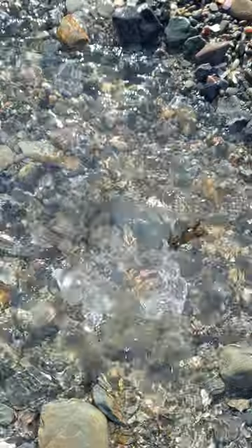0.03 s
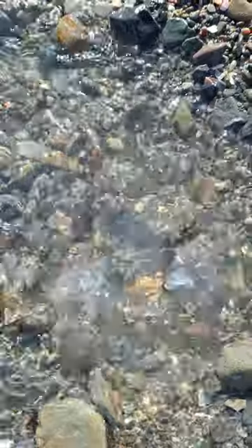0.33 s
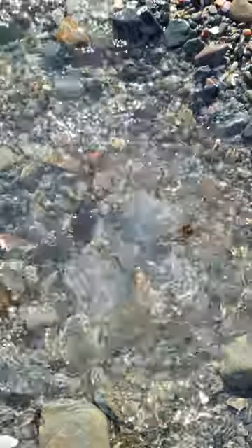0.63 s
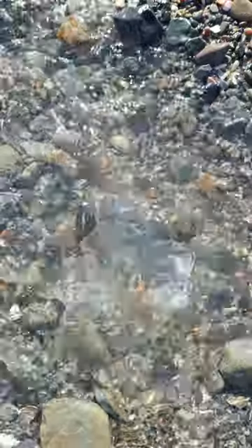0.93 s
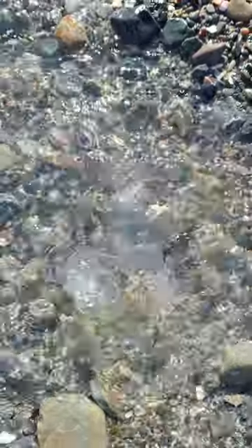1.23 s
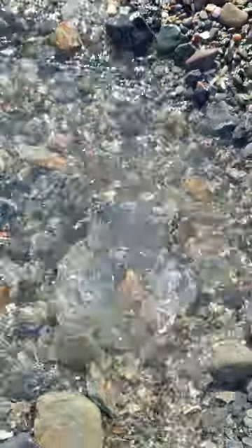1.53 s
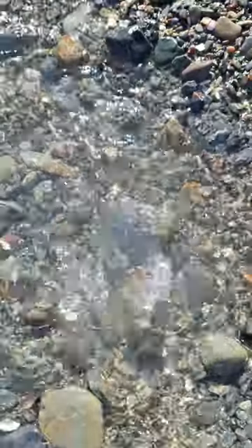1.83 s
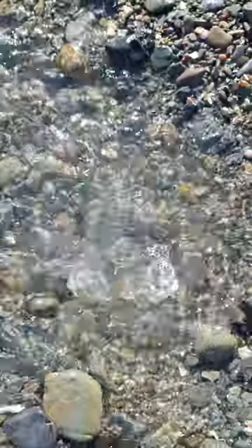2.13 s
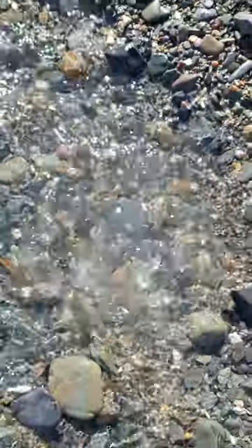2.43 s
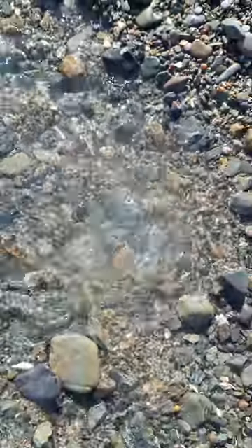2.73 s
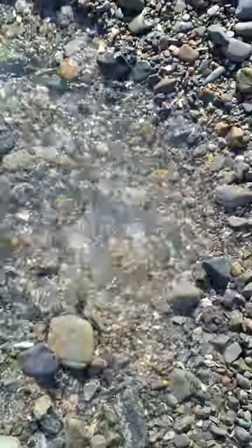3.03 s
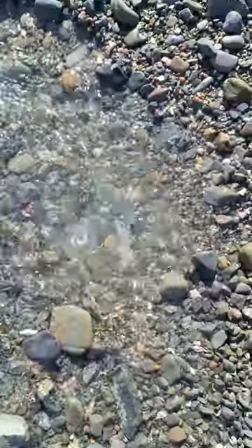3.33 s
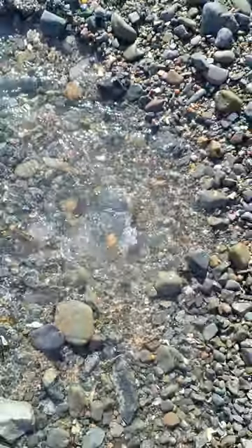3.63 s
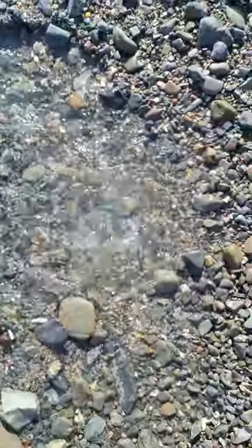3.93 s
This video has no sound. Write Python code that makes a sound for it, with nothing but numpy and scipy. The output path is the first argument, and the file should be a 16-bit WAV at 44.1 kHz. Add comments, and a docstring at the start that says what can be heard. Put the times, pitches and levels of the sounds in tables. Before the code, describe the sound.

Water wells up, gurgling and fizzing among beach pebbles, over low wind rumble.

```python
"""A spring wells up through shallow water on a pebble beach. Trapped air resonates, lower the larger
the pocket: big ones glug, small bubbles ring, and surface films burst with sharp ticks over a fine fizz.
Wavelets fold over the pebbles and trap clusters of bubbles. The nearby water makes a steady broadband
wash, and turbulent wind buffets the two ports of a hand-held microphone."""
import sys
import numpy as np
from scipy import signal
from scipy.fft import rfft, irfft
from scipy.io import wavfile
from scipy.ndimage import uniform_filter1d

SR = 44100
rng = np.random.default_rng(int(sys.argv[2]) if len(sys.argv) > 2 else 0)


def transcribe(u):
    """Save the signal u as a 16-bit wav file named by the first command-line argument.

    u: samples, shape (n,) or (channels, n), limited to [-1, 1]; the rate is SR.
    q: integer samples, one column per channel.
    """
    v = np.clip(np.atleast_2d(u).T, -1, 1)
    q = np.round(v * 32767).astype(np.int16)
    wavfile.write(sys.argv[1], SR, q)


N = 176400


# Large air pockets welling up: t/s, level/dB, f/Hz
GLUGS = [(0.097, -12.5, 145.2), (0.145, -14, 162.1), (1.205, -19, 192), (1.468, -18.5, 222),
         (1.676, -22.5, 267), (1.815, -15.5, 184), (2.135, -21.5, 261), (2.962, -25.5, 150.7)]
def glugs():
    """Resonance of a large air pocket: a low note of a few cycles that climbs as it nears the surface."""
    width_cycles, climb_per_s = 0.75, 9.74
    out, t = np.zeros((2, N)), (np.arange(4096) - 2048) / SR
    for s, db, hz in GLUGS:
        phase = 2 * np.pi * np.cumsum(hz * np.exp(climb_per_s * t)) / SR
        swell = np.exp(-.5 * (t * hz / width_cycles) ** 2)
        add(out, s + t[0], undb(db) * np.sin(phase) * swell)
    return out


def bubble(hz, cycles, glide):
    """Minnaert resonance: air is the spring, water the mass; the ring falls to 1/e in `cycles` periods."""
    rise_s = 0.00077
    t = np.arange(int(6 * cycles / hz * SR) + 2) / SR
    age = t * hz / cycles
    phase = 2 * np.pi * np.cumsum(hz * (1 + glide * np.minimum(age, 2))) / SR
    ring = np.sin(phase) * np.exp(-age) * (1 - np.exp(-t / rise_s))
    return ring / np.abs(ring).max()


# Bubbles in the shallows: t/s, level/dB, f/Hz, pan/dB (left minus right)
BUBBLES = [(0.202, -32.5, 2300, -1), (0.3293, -40, 1700, -1.0), (0.9045, -31, 3920, -5),
           (0.9038, -31, 4280, -2), (1.2603, -29, 1490, -2), (1.485, -33.5, 3620, -1),
           (1.522, -21, 1833, -2.0), (1.526, -30, 1710, -2), (2.04, -34, 3000, -4),
           (2.202, -33.5, 1910, -1), (2.2035, -35, 5100, -11), (2.2353, -30.5, 3830, 4),
           (2.264, -37, 2900, 0), (2.397, -40, 4020, -1), (2.444, -40, 3330, -3), (2.627, -39.5, 3820, 0),
           (2.654, -39, 3970, -1), (2.9881, -35.5, 2040, 5), (3.057, -35.5, 2010, -0.5),
           (3.166, -38, 3550, -5), (3.457, -38, 4640, 0), (3.472, -34.5, 1820, -3), (3.632, -35.5, 2000, 1),
           (3.725, -34.5, 3080, 1), (3.732, -33.5, 2460, -0.5), (3.909, -38.5, 2300, -2)]
def near_bubbles():
    """Damped free oscillation: the clearest bubbles ring singly, sinking slightly in pitch."""
    out = np.zeros((2, N))
    for s, db, hz, pan in BUBBLES:
        add(out, s, bubble(hz, cycles=11.6, glide=-0.035) * undb(db - 2.5) * sides(pan))
    return out


def burst(hz):
    """Impulsive excitation: a film snaps with a crack, a tiny ring and a short scatter off the pebbles."""
    crack_s, scatter_s, ring_cycles = 0.0006, 0.0035, 5.5
    low_hz, high_hz = 2620, 14100
    t = np.arange(1024) / SR
    crack = np.diff(noise_pair(alike=0.16, size=1025))
    crack = signal.sosfilt(signal.butter(1, (low_hz, high_hz), "band", fs=SR, output="sos"), crack)
    crack = signal.sosfilt(signal.butter(1, high_hz, fs=SR, output="sos"), crack)
    crack *= np.exp(-t / crack_s) + undb(-6.5) * np.exp(-t / scatter_s)
    ring = np.sin(2 * np.pi * hz * t) * np.exp(-t * hz / ring_cycles)
    snap = crack / np.abs(crack).max() + undb(-1) * ring
    return snap / np.abs(snap).max()


# Bubbles bursting at the surface: t/s, level/dB, f/Hz
BURSTS = [(0.2416, -27.5, 8300), (0.2554, -39, 5160), (0.2678, -39.5, 9700), (0.384, -28, 7600),
          (0.4622, -41, 12200), (0.4968, -31, 8000), (0.516, -45, 6100), (0.533, -45, 8000),
          (0.842, -33.5, 13400), (1.132, -34.5, 6600), (1.2792, -37, 5430), (1.3292, -37, 8200),
          (1.397, -37.5, 11300), (1.517, -28.5, 7860), (1.724, -33.5, 8100), (1.751, -34.5, 13500),
          (1.8112, -35, 5830), (1.9138, -31.5, 14800), (2.093, -37, 7040), (2.1326, -37, 8300),
          (2.2025, -25.5, 5200), (2.234, -39, 5890), (2.5712, -39, 7800), (2.6524, -41, 6100),
          (2.7083, -39, 6100), (2.806, -32.5, 11500), (2.8637, -38, 8000), (2.885, -40.5, 5870),
          (3.072, -40.5, 14100), (3.1731, -31.5, 10500), (3.725, -36.5, 6840)]
def near_bursts():
    """Film rupture close by: each bubble ends in one sharp tick."""
    out = np.zeros((2, N))
    for s, db, hz in BURSTS:
        add(out, s + 0.0015, burst(hz) * undb(db + 7) * sides(2 * rng.standard_normal()))
    return out


# Wavelets lapping on the pebbles: t/s, level/dB, centre f/Hz
LAPS = [(0.235, -33.5, 3210), (0.315, -35, 2120), (0.402, -33, 1670), (1.104, -37, 5640),
        (1.262, -30, 1560), (1.747, -25.5, 1780), (2.035, -32.5, 3210), (2.194, -39, 3380),
        (2.569, -37.5, 7900), (3.165, -35, 2910), (3.69, -36.5, 2750)]
def laps():
    """Air entrainment: a wavelet folds over a pebble and traps a dozen bubbles of similar size."""
    span_s, span_octaves = 0.024, 0.936
    out = np.zeros((2, N))
    for s, db, hz in LAPS:
        cluster = np.zeros((2, 8192))
        for late, pitch, loud, place in rng.random((12, 4)):
            ring = bubble(hz * 2 ** (span_octaves * (pitch - .5)), cycles=3.7, glide=0)
            add(cluster, late * span_s, ring * (1 + loud) * sides(10 * (place - .5)))
        add(out, s, cluster / np.abs(cluster).max() * undb(db))
    return out


def swarm(per_s, low_hz, high_hz, spread_db, cycles):
    """Incoherent superposition of bubbles of mixed sizes, strengths, glides and places; rms 1."""
    max_lag_s = .0002
    out = np.zeros((2, N))
    for when, pitch, faint, place, sustain, bend in rng.random((int(per_s * N / SR), 6)):
        hz = low_hz * (high_hz / low_hz) ** pitch
        db = -spread_db * np.log(max(faint, .03)) - 2 * pitch  # smaller bubbles are weaker
        ring = bubble(hz, cycles * (.5 + sustain), glide=0.16 * (bend - .5))
        pair = np.pad(ring, 32) * undb(db) * sides(12 * (place - .5))
        add(out, when * N / SR, lagged(pair, max_lag_s * (2 * place - 1)))
    return unit(out)


# Spectrum of the rippling water: f/Hz, level/dB
RIPPLE_SPECTRUM = [(500, -42), (1000, 8.5), (1550, 4.5), (2200, 4), (3800, -4.5), (5000, -18),
                   (8000, -12.5), (16000, -17)]
# Envelope of the ripple and babble: t/s, level/dB
RIPPLE_LEVEL = [(0.1, -47.5), (0.4, -46), (0.8, -49.5), (1.4, -45.5), (1.65, -46), (2.1, -46), (2.5, -46.5),
                (2.9, -49), (3.2, -46.5), (3.5, -46.5), (4.0, -50.5)]
def welling():
    """Resonant pitch falls with size: small bubbles babble and larger ones gurgle amid rippling noise."""
    ripple = wavering_noise(RIPPLE_SPECTRUM, alike=0.08, waver_db=3, waver_hz=150) * undb(0.5)
    babble = swarm(per_s=260, low_hz=1192, high_hz=4030, spread_db=2.4, cycles=8.6) * undb(-3)
    gurgle = swarm(per_s=90, low_hz=229.3, high_hz=902, spread_db=2.5, cycles=3) * undb(-39.5)
    return ((ripple + babble) * curve(RIPPLE_LEVEL) + gurgle) * sides(-0.9)


def prickle(per_s=70, lowest_hz=4500, spread_db=2.5):
    """Shot noise: faint, independent bursts scattered over the surface."""
    out = np.zeros((2, N))
    for when, pitch, faint, place in rng.random((int(per_s * N / SR), 4)):
        db = -50 - spread_db * np.log(max(faint, .04))
        add(out, when * N / SR, burst(lowest_hz * 3 ** pitch) * undb(db) * sides(6 * (place - .5)))
    return out


# Spectrum of the fizz: f/Hz, level/dB
FIZZ_SPECTRUM = [(1500, -4.5), (4000, 1), (6000, 2), (7200, 0), (8200, 2.5), (9300, -4), (12000, -1.5),
                 (16000, -2.5)]
# Envelope of the fizz: t/s, level/dB
FIZZ_LEVEL = [(0.1, 0.5), (0.9, 0), (2.2, -0.5), (2.95, 1), (3.5, 3.5), (4.0, 2)]
def fizz():
    """Superposition: a spray of tiny, briefly ringing bubbles merges with a fine hiss."""
    hiss = wavering_noise(FIZZ_SPECTRUM, alike=0.042, waver_db=2.06, waver_hz=160) * undb(-54)
    spray = swarm(per_s=440, low_hz=2920, high_hz=12000, spread_db=3, cycles=4.9) * undb(-58.5)
    return (hiss + spray) * curve(FIZZ_LEVEL)


# Spectrum of the water's wash: f/Hz, level/dB
WASH_SPECTRUM = [(60, -11.5), (150, -5.5), (300, -6), (450, -2.5), (650, -0.5), (900, -3.5), (1300, -9.5),
                 (2000, -18), (4000, -24), (16000, -70)]
# Envelope of the wash: t/s, level/dB
WASH_LEVEL = [(0.1, -43), (0.4, -36), (0.55, -36.5), (0.8, -34), (1.0, -34), (1.45, -33.5), (1.6, -38),
              (1.8, -36), (2.2, -37.5), (2.45, -38), (2.95, -39.5), (3.2, -37), (3.7, -34.5), (4.0, -37.5)]
def water_wash():
    """Partial coherence: a steady wash of nearby water, about half its power common to both ports."""
    wash = wavering_noise(WASH_SPECTRUM, alike=0.52, waver_db=1.7, waver_hz=50)
    return wash * curve(WASH_LEVEL) * undb(-0.5) * sides(-2)


# Gusts on the ports: t/s, level/dB, f/Hz, pan/dB (left minus right)
BUFFETS = [(0.088, -15.5, 81, 1.5), (0.147, -17.5, 109, -3), (0.215, -26, 190, 1), (0.322, -21, 136, -2),
           (0.367, -22, 101, 4), (0.402, -23.5, 112, 0), (0.436, -24, 90, 5), (0.612, -16, 94, -3),
           (0.645, -15, 104, 0), (0.686, -20.5, 80, 1), (0.78, -25.5, 123, 2), (0.937, -21, 97, 10),
           (1.131, -22.5, 106, 7), (1.207, -22, 130, 9), (1.385, -13.5, 79.5, -1), (1.461, -14, 111, 4.5),
           (1.526, -16, 96, -0.5), (1.684, -23.5, 107, -6.5), (1.754, -23, 85, -2), (1.803, -17.5, 90, -5),
           (1.912, -22.5, 89, 0), (2.084, -16.5, 123, -1), (2.172, -23.5, 110, -2), (2.212, -18, 127, -7),
           (2.712, -21, 109, -1.5), (2.96, -20.5, 118, 2), (3.112, -23, 102, 2.5), (3.222, -22, 126, -3),
           (3.345, -24.5, 136, -1), (3.669, -19, 120, -3.5), (3.73, -22, 125, 2), (3.8, -21, 110, -5),
           (3.845, -13.5, 119, -2), (3.93, -18.5, 143, 9.5), (3.967, -20.5, 117, -1)]
def wind_buffets():
    """Turbulent pressure fluctuation: eddies thump each port almost independently in short gusts."""
    rise_s, fall_s, rolloff = 0.015, 0.013, 1.89
    out = np.zeros((2, N))
    t, f = (np.arange(8192) - 4096) / SR, np.fft.rfftfreq(8192, 1 / SR)
    swell = np.exp(-.5 * (t / np.where(t < 0, rise_s, fall_s)) ** 2)
    for s, db, hz, pan in BUFFETS:
        eddies = undb(6.5 * unit(uniform_filter1d(rng.standard_normal(len(t)), size=200)))
        pressure = noise_pair(alike=0.047, size=len(t)) * swell * eddies
        ratio = f / (0.68 * hz)
        band = ratio ** 2 / (1 + ratio ** 4) ** (.5 + rolloff / 4)  # falls as f ** -rolloff
        thump = irfft(rfft(pressure) * band)
        thump *= np.sqrt(np.sum(swell ** 2) / np.sum(thump ** 2, axis=1, keepdims=True))
        add(out, s + t[0], thump * undb(db - .5) * unit(sides(pan)))
    return out


# Spectrum of the wind flutter: f/Hz, level/dB
FLUTTER_SPECTRUM = [(6, -42), (18, -3), (30, -32), (50, 0.5), (66, 1.5), (100, -2), (160, -11),
                    (300, -19.5), (600, -24), (1500, -53)]
def wind_flutter(waver_db=3, waver_hz=45):
    """Sustained turbulence: a low flutter, uncorrelated between the ports and stronger on the left."""
    ports = []
    for _ in range(2):
        pressure = rng.standard_normal(N) * undb(waver_db * walk(waver_hz))
        ports.append(unit(colour(pressure, FLUTTER_SPECTRUM)))
    return np.array(ports) * undb(-31) * sides(7)


def wavering_noise(spectrum, alike, waver_db, waver_hz):
    """Random amplitude modulation of coloured noise at both ports; rms 1."""
    return unit(colour(noise_pair(alike, N), spectrum) * undb(waver_db * walk(waver_hz)))


def noise_pair(alike, size):
    """Two white noises with correlation coefficient `alike`."""
    noise = rng.standard_normal((3, size))
    return np.sqrt(alike) * noise[0] + np.sqrt(1 - alike) * noise[1:]


def walk(hz):
    """Random levels held for 1 / hz seconds and smoothed twice; spread near 1."""
    hold = int(SR / hz)
    steps = np.repeat(rng.standard_normal(N // hold + 1), hold)
    return 1.53 * uniform_filter1d(uniform_filter1d(steps, hold), hold)[:N]


def colour(x, spectrum):
    """Spectral shaping by (f/Hz, level/dB) points."""
    hz, db = np.array(spectrum).T
    log_f = np.log(np.fft.rfftfreq(N, 1 / SR) + 1)
    return irfft(rfft(x) * undb(np.interp(log_f, np.log(hz), db)), N)


def curve(points):
    """Amplitude envelope through (t/s, level/dB) points."""
    return undb(np.interp(np.arange(N) / SR, *np.array(points).T))


def sides(pan_db):
    """Level difference as left and right gains."""
    return undb(np.array([[pan_db], [-pan_db]]) / 2)


def lagged(pair, lag_s):
    """Arrival-time difference: the right port lags the left."""
    return np.array([pair[0], np.roll(pair[1], int(round(lag_s * SR)))])


def undb(db):
    """Decibels to amplitude ratio."""
    return 10 ** (np.asarray(db) / 20)


def unit(x):
    """Scale to rms 1."""
    return x / np.sqrt(np.mean(x ** 2))


def add(out, s, x):
    """Superpose a short sound at s seconds."""
    i = int(np.clip(s * SR, 0, N - 1))
    out[:, i:i + x.shape[-1]] += x[..., :N - i]


def scene():
    """Linear superposition: the pool reaches the right port slightly late; single events do not."""
    wind = wind_flutter() + wind_buffets()
    singles = glugs() + near_bubbles() + near_bursts() + laps()
    pool = welling() + prickle() + fizz() + water_wash()
    return singles + lagged(pool, lag_s=.00022) + wind


def record(dry):
    """Gating and band limiting: the sound opens after a brief silence, its highest treble cut."""
    start_s, top_hz = .068, 16000
    opened = dry * (np.arange(N) / SR >= start_s)
    return signal.sosfilt(signal.ellip(10, .2, 80, top_hz, fs=SR, output="sos"), opened)


dry = scene()
out = record(dry)
transcribe(out)
```